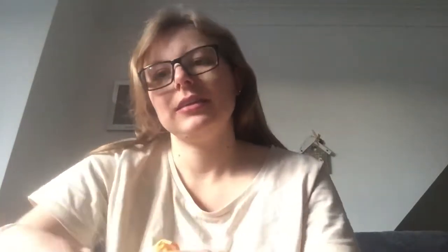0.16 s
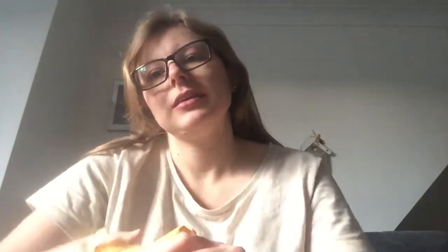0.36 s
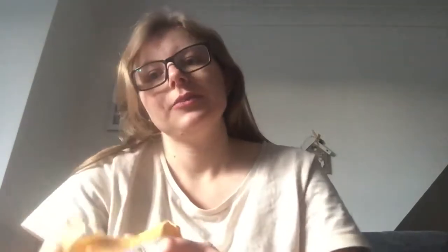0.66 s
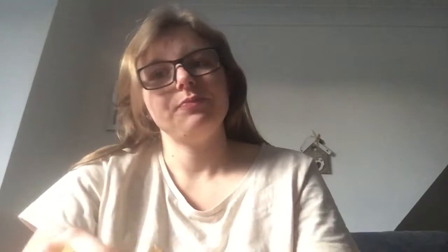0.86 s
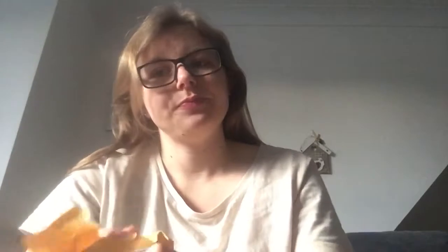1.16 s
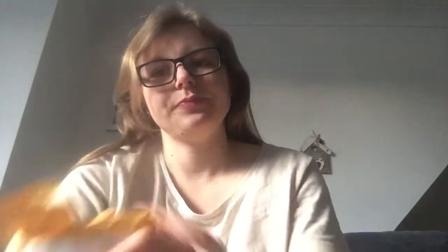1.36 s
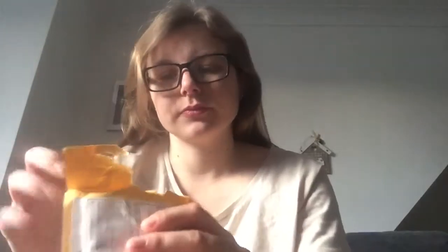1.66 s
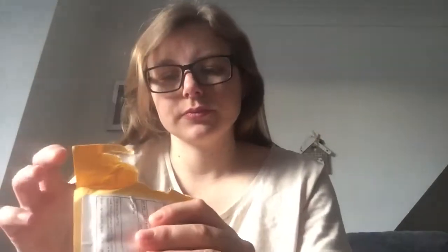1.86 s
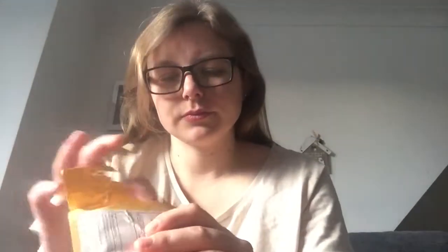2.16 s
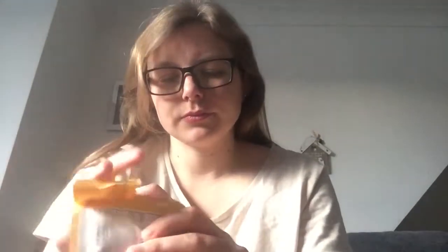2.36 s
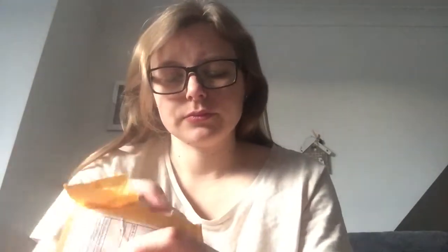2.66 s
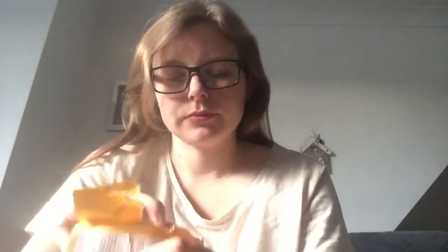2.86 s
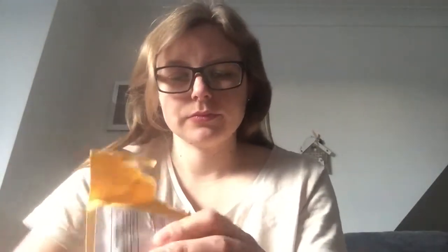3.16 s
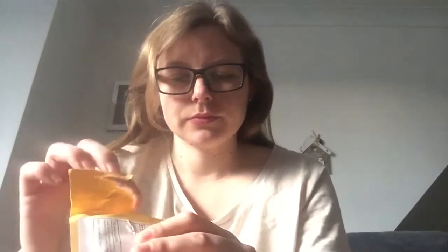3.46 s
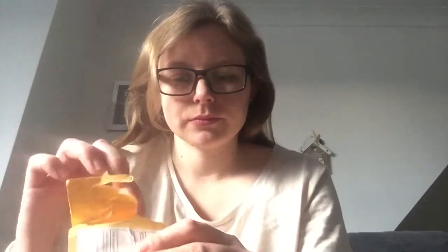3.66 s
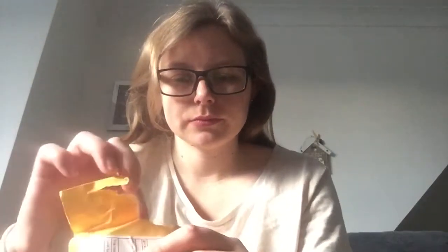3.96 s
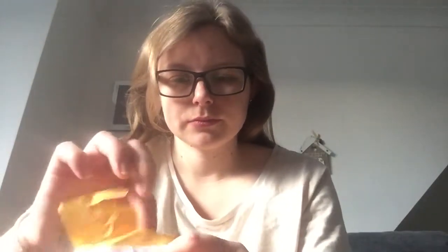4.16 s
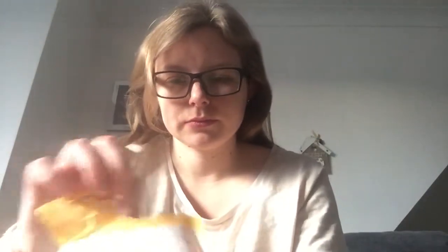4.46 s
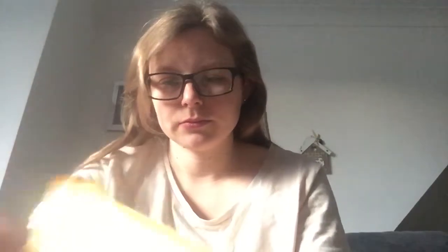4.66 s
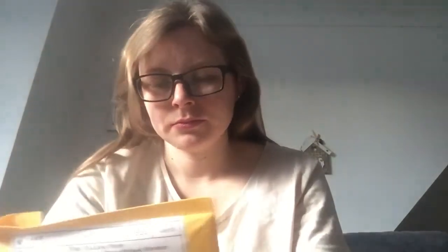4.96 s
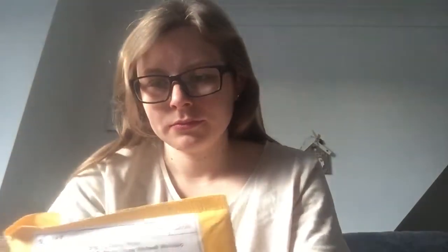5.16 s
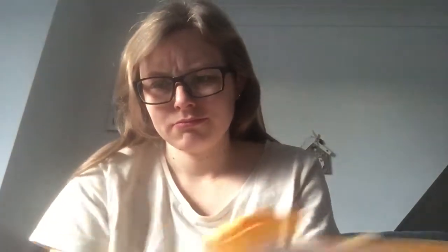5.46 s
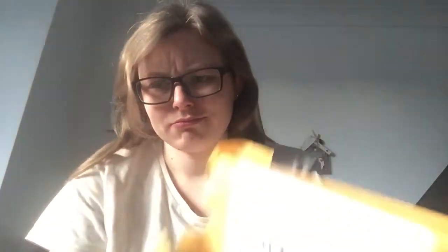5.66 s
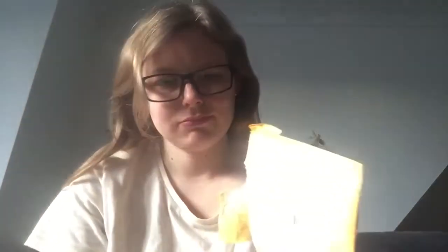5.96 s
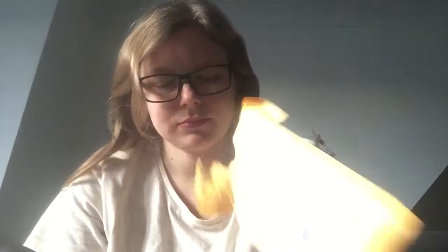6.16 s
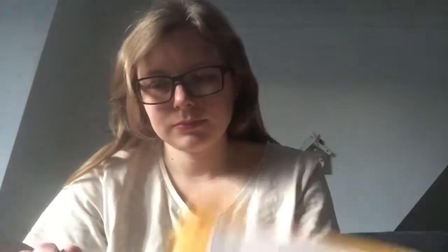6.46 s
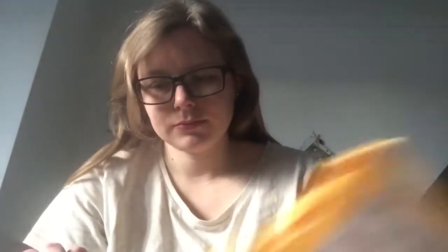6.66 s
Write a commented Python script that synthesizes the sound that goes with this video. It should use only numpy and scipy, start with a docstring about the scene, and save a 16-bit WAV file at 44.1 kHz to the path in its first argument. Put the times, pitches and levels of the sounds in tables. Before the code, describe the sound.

A stiff padded paper envelope crackles busily under tugging fingers, with a few quick sharp rips and dull thuds in a small quiet room.

```python
"""A padded paper mailing envelope is picked at and torn open by hand.
Creases snap one by one over a fine crinkle made of tiny ringing jolts; a few quick rips pack the jolts densely.
Paper and pouch colour all of these. Dull thuds are decaying sine swings, fingers scuff the padding, and
the paper squeaks once. A small room answers with a short noise tail, over low rumble and a little hiss."""
import sys
import numpy as np
from scipy import signal
from scipy.fft import rfft, irfft, next_fast_len
from scipy.io import wavfile
from scipy.ndimage import uniform_filter1d

SR = 44100
rng = np.random.default_rng(int(sys.argv[2]) if len(sys.argv) > 2 else 0)


def wav_out(sig):
    """Save sig, one row per channel (or a flat mono array), as 16-bit PCM at SR to the path in sys.argv[1]."""
    wavfile.write(sys.argv[1], SR, np.round(np.clip(np.atleast_2d(sig).T, -1, 1) * 32767).astype(np.int16))


N = 300762
TIME = np.arange(N) / SR  # seconds


def undb(db):
    """Turn decibels into a gain."""
    return 10 ** (np.asarray(db) / 20)


def unit(x):
    """Scale a signal to an rms of one."""
    return x / np.sqrt(np.mean(x ** 2))


def colour(x, points):
    """Filter through (Hz, dB) points without sounding early (minimum phase), so attacks stay sharp."""
    size = next_fast_len(len(x) + 4096, True) * 2
    hz, db = np.transpose(points)
    freqs = np.maximum(np.fft.rfftfreq(size, 1 / SR), 1)
    curve_db = np.interp(np.log(freqs), np.log(hz), db)
    # folding the cepstrum forward in time gives the minimum-phase filter
    cepstrum = irfft(np.log(undb(curve_db)))
    cepstrum[1:size // 2] *= 2
    cepstrum[size // 2 + 1:] = 0
    response = np.exp(rfft(cepstrum))
    return irfft(rfft(x, size) * response)[:len(x)]


def flutter(per_s):
    """Smooth random unevenness with a spread of one: random knots joined by straight lines."""
    knots = rng.standard_normal(4096)
    return unit(np.interp(TIME * per_s, np.arange(len(knots)), knots))


# How hard the envelope is held between pulls.
# Each row: time in seconds, crinkle level in dB before unevenness and filters.
HOLD_LEVELS = [(0, -66), (.3, -61), (.58, -69), (1.1, -60), (1.55, -69), (1.76, -83), (2.08, -86),
               (2.2, -64.5), (2.9, -68), (3.25, -66), (3.37, -86), (3.52, -84.5), (3.75, -72), (4.1, -77),
               (4.65, -67.5), (5.7, -68), (5.84, -86), (6.14, -84.5), (6.45, -68), (6.82, -75)]
# The fingers grip, pull and let go, one row per pull.
# Each row: start in seconds, length in seconds, crinkle level in dB halfway through, swell over the length in dB,
# colour in Hz, level of the skin's scuff in dB. Levels are before unevenness and filters.
FINGER_PULLS = [(0.056, 0.19, -49, 7, 4400, -65), (0.358, 0.16, -52.5, -1, 5170, -69.5),
                (0.62, .135, -58, 8, 5300, -64), (.765, 0.12, -48.5, 1, 6000, -61.5),
                (0.945, 0.094, -53, -7, 3700, -77), (1.071, 0.17, -54.5, 3, 5000, -64),
                (1.271, .105, -50, 2.5, 4570, -61), (1.418, .11, -58, -13, 3810, -78),
                (1.588, 0.07, -61, -6, 3790, -73), (2.111, 0.082, -60, 0, 5900, -71),
                (2.207, 0.17, -53, 1, 4190, -61.5), (2.452, 0.083, -52.5, -4, 6750, -64),
                (2.641, 0.092, -55.5, 1, 4192, -69), (2.782, 0.076, -59, 7.5, 4550, -63.5),
                (2.927, 0.16, -58.5, -4.5, 4706, -66), (3.099, 0.066, -52.5, -4.5, 3800, -61),
                (3.242, 0.059, -56.5, -5.5, 4470, -74), (3.31, .23, -79, -8.5, 1700, -72),
                (3.568, 0.11, -69, 3, 3816, -68), (3.698, 0.095, -62.5, -2.5, 3755, -71),
                (3.867, 0.11, -69.5, -8, 3932, -75.5), (4.068, 0.018, -68, 0, 2920, -69),
                (4.221, .058, -56, 7, 7000, -68.5), (4.388, 0.13, -54.5, 1, 3230, -65),
                (4.546, 0.082, -60, -7, 3616, -74.5), (4.73, 0.054, -62, -5, 4990, -73),
                (4.887, 0.031, -58.5, -2, 2499, -77), (4.971, .04, -63, 1, 5500, -78.5),
                (5.053, .1, -54, -12, 4295, -66.5), (5.213, 0.028, -61, 2.5, 5370, -75),
                (5.337, 0.087, -64, 1, 3295, -85.5), (5.451, 0.15, -52, 3.5, 5000, -74),
                (5.666, .012, -50, -2.5, 5496, -61), (5.73, 0.032, -46, -3, 4600, -84),
                (6.215, 0.029, -62, 2, 3980, -67), (6.315, 0.039, -52.5, 0.5, 5403, -77),
                (6.383, 0.056, -59.5, 4.5, 7806, -75), (6.544, 0.041, -54.5, -4.5, 5504, -67.5),
                (6.628, .11, -72, 0.5, 4200, -71.5)]


def handling(hold_hz=4300, hold_scuff_db=-77.5, attack_s=0.007, release_s=0.022):
    """Paper takes up each pull's strain quickly and settles more slowly; gives crinkle gain, colour, scuff gain."""
    power = undb(np.interp(TIME, *np.transpose(HOLD_LEVELS))) ** 2
    tint = power * hold_hz
    scuff = np.full(N, undb(hold_scuff_db) ** 2)  # the skin resting on the padding
    for start, length, db, swell_db, hz, scuff_db in FINGER_PULLS:
        age = TIME - start
        before = np.minimum(age, 0) / attack_s
        after = np.maximum(age - length, 0) / release_s
        grip = np.exp(np.maximum(before - after, -20))
        progress = np.clip(age / length, 0, 1)
        pull = (grip * undb(db + swell_db * (progress - .5))) ** 2
        power = power + pull
        tint = tint + pull * hz
        scuff = scuff + (grip * undb(scuff_db)) ** 2
    return np.sqrt(power), tint / power, np.sqrt(scuff)  # colour is averaged by power


def bursts(times, energy, hz, q, decay_s, size, rise=1.0):
    """Short jolts, each ringing one damped patch of paper at its own pitch, summed at their times."""
    age = np.arange(size) / SR / decay_s[:, None]  # in decay times
    signs = rng.choice([-1., 1.], (len(times), size))
    jolts = signs * np.exp(-age) * (1 - np.exp(-age / rise))
    ratio = np.maximum(np.fft.rfftfreq(size, 1 / SR), 1) / hz[:, None]
    resonance = 1 + 1j * q[:, None] * (ratio - 1 / ratio)
    waves = irfft(rfft(jolts) / resonance)
    waves *= np.sqrt(energy / np.sum(waves ** 2, axis=1))[:, None]
    places = (np.maximum(times, 0) * SR).astype(int)[:, None] + np.arange(size)
    return np.bincount(places.ravel(), waves.ravel(), N)[:N]


def facet_q(hz, q_mid=1.93, slope=0.23):
    """Large, low-pitched facets ring more clearly than small ones; q_mid applies at 3000 Hz."""
    return q_mid * (hz / 3000) ** -slope


def crackle(gain, hz, per_s, spread_db, scatter, decay_s):
    """A swarm of tiny fractures, mostly weak and a few strong, whose power follows gain; scatter is in octaves."""
    due = np.cumsum(per_s) / SR
    total = int(due[-1])
    order = np.arange(total) + rng.uniform(0, 2, total)
    at = np.minimum(np.searchsorted(due, order), N - 1)
    strength = undb(spread_db * np.minimum(rng.exponential(size=total), 3.5)) ** 2
    # the fingers feed in energy steadily: a big fracture relieves its neighbours
    strength /= uniform_filter1d(strength, size=25)
    pitch = np.clip(hz[at] * 2 ** (scatter * rng.standard_normal(total)), 250, 14000)
    energy = strength * gain[at] ** 2 * SR / per_s[at]
    return bursts(at / SR, energy, pitch, facet_q(pitch), np.full(total, decay_s), size=256)


def crinkle(gain, hz, uneven_db=3.0, bed_db=-1.02):
    """Paper and padding crackle in little flurries under the fingers; harder handling wakes more creases."""
    per_s = np.clip(950 * (gain / undb(-55)) ** .15, 100, 4000)
    uneven_gain = gain * undb(bed_db + uneven_db * flutter(60))
    return crackle(uneven_gain, hz, per_s, spread_db=3.0, scatter=0.69, decay_s=0.00089)


def stray_snaps(gain, hz, count=600):
    """Of many strained creases a few give way, more often and louder under a harder pull; rows as in SINGLE_CREASES."""
    rate_per_s, rate_at_db, growth = 42, -52, .3  # rate at this crinkle level; it grows as this power of the gain
    over_db, spread_db = 11.5, 1.5  # level over the crinkle
    pitch_share, spread_octaves, ring_q = 0.61, 0.81, 2.2  # larger facets than the crinkle's, so lower
    at = ((np.arange(count) + rng.random(count)) * (N - 1) / count).astype(int)
    luck = rng.random(count)
    size, pitch = np.clip(rng.standard_normal((count, 2)), -2, 2).T
    wanted_per_s = rate_per_s * (gain[at] / undb(rate_at_db)) ** growth
    gives = luck < wanted_per_s * N / SR / count
    db = 20 * np.log10(gain[at]) + over_db + spread_db * size
    tone = hz[at] * pitch_share * 2 ** (spread_octaves * pitch)
    return np.column_stack([at / SR, db, tone, np.full(count, ring_q)])[gives]


# Creases heard singly: loud ones in the pulls, fainter ones standing out in quiet stretches.
# Each row: time in seconds, level over one millisecond in dB before trim and filters, colour in Hz,
# resonance as a Q (higher rings longer).
SINGLE_CREASES = [(0.045, -36, 3630, 1.3), (0.0574, -33, 1010, 1.3), (0.1248, -35, 800, 1.5),
                  (0.1362, -29.5, 6400, 1.4), (0.1586, -40, 3600, .6), (.1683, -33, 3000, .6),
                  (.198, -29, 1350, 1.1), (.2136, -36, 1400, 2.5), (0.2248, -27, 8500, .55),
                  (0.243, -34, 12000, 0.14), (.361, -42, 1200, 3), (0.3754, -33, 2400, .5),
                  (0.4062, -26, 8000, 0.43), (.457, -39, 1090, 1.4), (0.4746, -30.5, 2500, 0.17),
                  (0.4895, -30.5, 4530, 0.16), (0.7545, -30.5, 3370, 0.39), (0.7761, -30, 2050, .23),
                  (0.7997, -30.5, 2698, 0.29), (0.8202, -28.5, 2980, 0.36), (.852, -34.5, 2400, 0.2),
                  (0.941, -40.5, 915, 2.8), (.9477, -28.5, 3800, 1.1), (0.9597, -28, 1846, 1),
                  (1.0095, -30, 4230, 0.57), (1.0268, -33, 1330, .7), (1.07, -36, 5300, 0.14),
                  (1.1345, -36.5, 2000, 0.61), (1.1408, -35, 12000, 0.39), (1.1919, -27, 2760, 2.57),
                  (1.2004, -32, 2497, .8), (1.2205, -35.5, 3580, 5.2), (1.2608, -35.5, 1110, 1.1),
                  (1.2782, -28.5, 1390, .35), (1.2932, -27.5, 5000, 2), (1.3058, -26.5, 2780, 0.24),
                  (1.351, -28.5, 1500, 0.17), (1.4247, -31.5, 2940, 7.7), (1.5006, -37, 9460, 0.45),
                  (1.5114, -35, 1470, .3), (1.6354, -41, 3804, 3), (1.649, -39.5, 2100, 1.1),
                  (1.8801, -44, 3030, 2.9), (2.2055, -29.5, 5560, .3), (2.2731, -28.5, 5600, 0.27),
                  (2.3085, -30, 1120, 0.58), (2.3306, -29, 2500, 0.21), (2.3363, -31, 1993, 2.4),
                  (2.3458, -33.5, 3400, 0.4), (2.383, -34, 2060, 0.69), (2.4663, -33.5, 4780, 0.55),
                  (2.497, -36, 2160, 1.1), (2.523, -30, 2565, 4), (2.654, -39, 2241, 1),
                  (2.7134, -32, 1406, 0.86), (2.8298, -33.5, 2185, 1.5), (2.845, -35.5, 5300, 0.27),
                  (2.924, -41, 3610, 0.99), (2.9321, -33, 3086, 2.3), (2.9898, -34, 2760, 1.1),
                  (3.081, -24.5, 2960, 2.1), (3.1229, -26.5, 4210, 2.7), (3.181, -35.5, 4330, 12),
                  (3.2292, -33, 3797, 1), (3.2513, -30.5, 3800, 0.84), (3.3089, -34, 2064, 0.91),
                  (3.7027, -43.5, 746, 1.5), (3.7422, -38, 4130, 1.3), (3.7794, -35, 4600, .45),
                  (3.9407, -50, 8000, 0.77), (4.0764, -40.5, 1283, 0.25), (4.1687, -43, 7060, 7.1),
                  (4.1955, -46.5, 7190, 2.2), (4.209, -33.5, 6940, 3), (4.3623, -47.5, 1128, 3.5),
                  (4.3996, -33, 1772, 5), (4.4086, -33, 2760, 1.3), (4.734, -34.5, 7145, 0.15),
                  (4.7445, -41, 2684, 1.6), (4.828, -49, 1400, 3.5), (4.858, -39, 12030, 0.3),
                  (4.9994, -46, 3570, 2.9), (5.0529, -38.5, 1330, 3.4), (5.0684, -30.5, 2190, 0.91),
                  (5.2039, -37.5, 4064, 0.42), (5.2303, -30, 4560, 1.8), (5.3417, -40.5, 1210, 4.8),
                  (5.363, -32, 4960, 0.25), (5.536, -27, 8030, .3), (5.5434, -24, 12050, 0.55),
                  (5.5746, -26, 7150, 0.51), (5.665, -28, 12130, 0.29), (5.7583, -32, 9460, 0.87),
                  (6.2301, -48, 1700, 1.92), (6.358, -52, 7460, 2.5), (6.573, -39.5, 3400, 0.2),
                  (6.642, -48, 1500, 1.27)]


def snaps(gain, hz, stutter_db=-10, stutter_s=.0018, trim_db=-2.0):
    """Creases pop in about a millisecond, with a lesser slip just before or after; larger facets take longer."""
    s, db, pitch, q = np.transpose(np.vstack([SINGLE_CREASES, stray_snaps(gain, hz)]))
    energy = undb(db) ** 2 * SR * 10 ** -3
    decay_s = 0.00056 * (pitch / 4500) ** -.45
    lag, detune = rng.standard_normal((len(s), 2)).T
    pop = bursts(s - .0005, energy, pitch, q, decay_s, size=512)
    slip = bursts(s + stutter_s * lag, energy, pitch * 2 ** (.5 * detune), q, decay_s, size=512)
    return undb(trim_db) * (pop + undb(stutter_db) * slip)


# The runs of the tear.
# Each row: start in seconds, attack in seconds, length in seconds, level in dB before filters,
# fade over the length in dB (its sign is ignored), colour in Hz, spread of pitches in octaves.
TEAR_RUNS = [(1.273, 0.018, 0.036, -31.5, 3, 5130, 1.24), (1.309, 0.013, .035, -33.5, 0, 3160, 1.32),
             (3.054, 0.0033, 0.0087, -41, -9, 4190, 1.1), (3.0624, 0.0021, 0.0084, -24.5, 4.5, 3260, 0.72),
             (3.079, 0.0021, 0.047, -41, 5, 3670, 0.36), (3.18, .004, 0.007, -47, 11, 4250, 0.27),
             (5.457, 0.026, 0.064, -29, 3.5, 3497, 1.17), (5.522, 0.0027, 0.061, -36.5, 4.5, 4993, 1),
             (6.437, 0.0026, 0.01, -66, 0, 2450, 1.4)]


def rips(uneven_db=0.0):
    """A running tear breaks fibres so fast that they merge into a coarse rasp."""
    out = np.zeros(N)
    catches = undb(uneven_db * flutter(220))  # steady at 0 dB of unevenness
    for start, attack, length, db, fade_db, hz, scatter in TEAR_RUNS:
        age = np.maximum(TIME - start, 0)
        rise = np.minimum(age / attack, 1)
        release = np.exp(-np.maximum(age - length, 0) / 0.0037)
        gain = rise * undb(db - abs(fade_db) * age / length) * release
        running = (age > 0) & (age < 2 * length + .01)
        per_s = np.where(running, 3000., 10 ** -6)  # fibres per second
        out += crackle(gain * catches, np.full(N, hz), per_s, spread_db=3.0, scatter=scatter, decay_s=0.00062)
    return out


# Modes of the stiff pouch, rung by every crease and tear.
# Each row: frequency in Hz, width in Hz, gain in dB.
POUCH_MODES = [(366, 33, 3.5), (639, 37, 1), (744, 44, -1.5), (1474, 230, -10.5), (1710, 28, -6),
               (1930, 15, -2.5), (4400, 100, -26), (5920, 180, -11)]


def pouch(x):
    """The pouch lends its modes to whatever shakes it."""
    out = x
    for hz, width, db in POUCH_MODES:
        b, a = signal.iirpeak(hz, hz / width, fs=SR)
        out = out + undb(db) * signal.lfilter(b, a, x)
    return out


# What the paper radiates.
# Each row: frequency in Hz, gain in dB.
PAPER_COLOUR = [(100, 1.5), (350, 0), (520, -3), (750, 0.5), (1100, 1), (1550, .5), (2500, 0.5), (4500, 2),
                (8000, 1), (10000, 2), (13000, 4), (16000, -4.5)]


def radiate(x):
    """Fractures reach the air through the paper and its pouch."""
    return undb(-0.5) * pouch(colour(x, PAPER_COLOUR))


# The pouch flexes or knocks against a hand.
# Each row: time in seconds, level over ten milliseconds in dB before the thud filter, pitch in Hz.
POUCH_FLEXES = [(0.062, -47.5, 149), (.228, -55.5, 400), (0.504, -61, 381), (.674, -60, 439.3),
                (1.301, -58, 326.5), (1.333, -46.5, 390), (1.339, -46, 217.6), (1.345, -47.5, 75),
                (2.505, -50, 227.4), (2.931, -49, 169), (3.07, -38.5, 358.6), (3.072, -35, 99),
                (3.176, -55, 268), (3.306, -60, 279), (3.704, -51.5, 218), (4.41, -58.5, 330),
                (4.898, -55.5, 84), (5.069, -51, 194), (5.492, -45, 210.6), (5.53, -43, 220.6),
                (5.539, -50, 171.3), (6.549, -55, 106.7), (6.569, -57, 208.9), (6.645, -56, 179.3)]


def flexes(cycles=0.65):
    """The air-filled pouch swings once or twice and stops: a dull thud."""
    out = np.zeros(N)
    for s, db, hz in POUCH_FLEXES:
        turns = np.maximum(TIME - s, 0) * hz
        envelope = np.exp(-turns / cycles) * (1 - np.exp(-turns / 0.41))
        thud = np.sin(2 * np.pi * turns) * envelope
        out += undb(db) * thud * np.sqrt(SR * 10 ** -2 / np.sum(thud ** 2))
    return colour(out, [(22, -10), (60, -4.5), (400, 3.5), (1500, -11.5)])


def rubbing(gain, uneven_db=3):
    """Fingers catch and slide on the padding: a dull, uneven scuff."""
    uneven_gain = gain * undb(uneven_db * flutter(40))
    scuff = crackle(uneven_gain, np.full(N, 480.), np.full(N, 700.), spread_db=2.5, scatter=0.71, decay_s=0.0013)
    return colour(scuff, [(100, -6.5), (300, 3.0), (500, -2.5), (800, -5.5), (1800, 4.0), (6000, 3.5)])


# The envelope squeaks once as it slides.
# The single row: level in dB around which it varies, pitch in Hz around which it wavers.
SLIDE_SQUEAK = (-61, 1680)


def squeak(waver=.025, uneven_db=3, middle_s=6.648, half_s=.022):
    """Paper sticks and slips for a moment, unevenly and at a wavering pitch."""
    db, hz = SLIDE_SQUEAK
    phase = 2 * np.pi * np.cumsum(hz * (1 + waver * flutter(140))) / SR
    swell = np.exp(-((TIME - middle_s) / half_s) ** 2)
    return undb(db + uneven_db * flutter(200)) * np.sin(phase) * swell


def room(x, wet_db=-6.5, t60_low=0.32, t60_high=0.21, gap_s=0.0075):
    """The walls return a diffuse tail that swells in over a short gap; its treble dies first (t60 in seconds)."""
    age = np.arange(SR // 2) / SR
    noise = rng.standard_normal(len(age))
    low = signal.sosfilt(signal.butter(1, 4000, fs=SR, output="sos"), noise)
    high = noise - low
    fall = -np.log(1000) * age  # 60 dB down after one t60
    tail = low * np.exp(fall / t60_low) + high * np.exp(fall / t60_high)
    tail *= np.clip(age / gap_s, 0, 1) ** 2
    tail /= np.sqrt(np.sum(tail ** 2))
    tail = colour(tail, [(150, -1.0), (600, -5.0), (1500, -2.0), (5000, -5.0), (14000, -1.5)])
    return undb(wet_db) * signal.fftconvolve(x, tail)[:N]


# The tone of the quiet room.
# Each row: frequency in Hz, relative level in dB.
QUIET_ROOM = [(15, -44), (25, -21), (64, -4), (97, -3), (130, -8), (166, -5.5), (212, -8), (270, -11.5),
              (363, -17.5), (427, -33), (503, -30), (545, -20.5), (8590, -34), (16000, -63)]


def background(rumble_db=-71, hiss_db=-79):
    """Steady low room rumble, made of coloured noise, with a little white microphone hiss."""
    rumble = unit(colour(rng.standard_normal(N), QUIET_ROOM))
    hiss = rng.standard_normal(N)
    return undb(rumble_db) * rumble + undb(hiss_db) * hiss


def scene(thud_room_db=-5):
    """The envelope in its room."""
    gain, hz, scuff = handling()
    fractures = crinkle(gain, hz) + rips() + snaps(gain, hz)
    paper = radiate(fractures) + rubbing(scuff) + squeak()
    thuds = flexes()
    walls = room(paper + undb(thud_room_db) * thuds)  # thuds reach the walls more weakly
    return (paper + thuds + walls + background())[None]


def record(dry):
    """The recorder cuts the deepest bass below 38 Hz and the top above 16 kHz."""
    bass_cut = signal.butter(4, 38, "highpass", fs=SR, output="sos")
    top_cut = signal.ellip(10, .2, 70, 16000, fs=SR, output="sos")
    return signal.sosfilt(top_cut, signal.sosfilt(bass_cut, dry))


dry = scene()
out = record(dry)
wav_out(out)
```